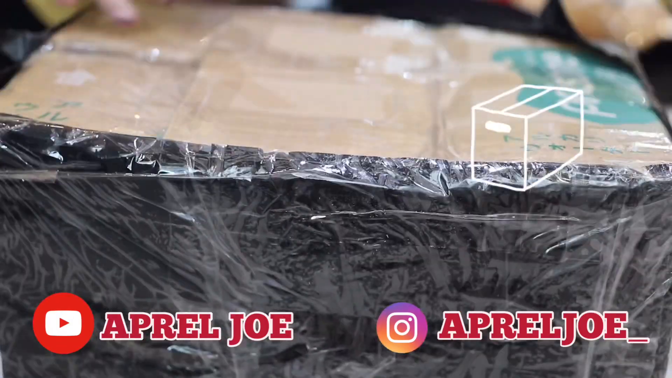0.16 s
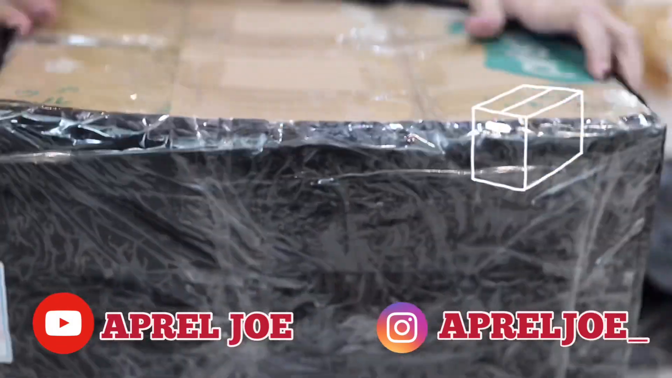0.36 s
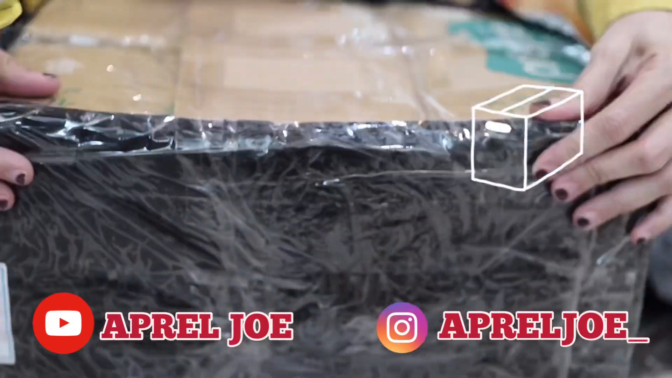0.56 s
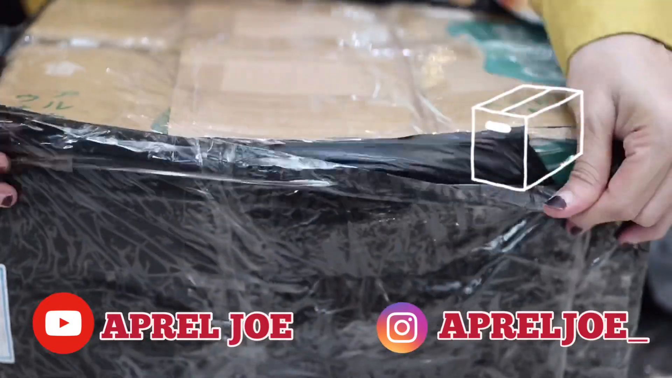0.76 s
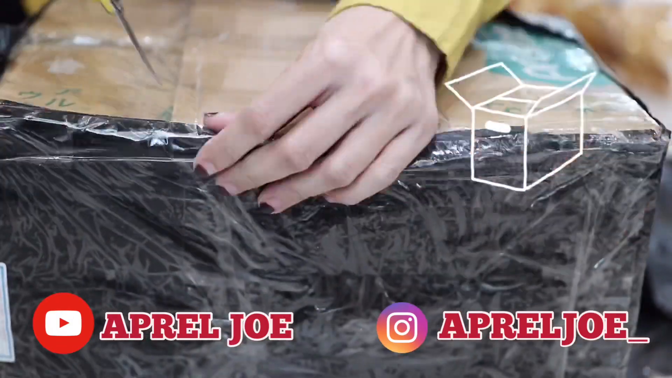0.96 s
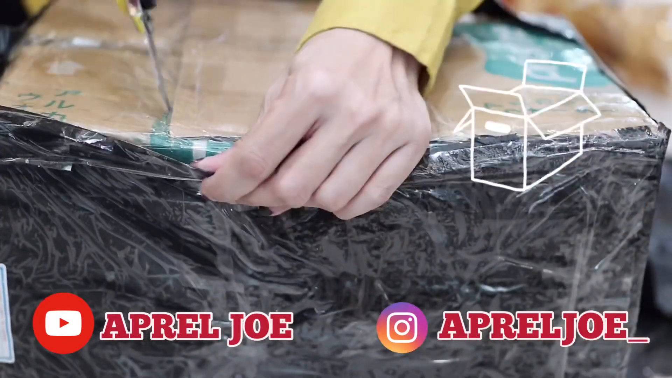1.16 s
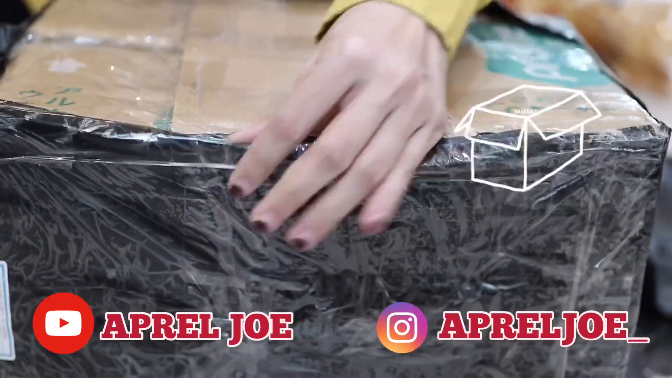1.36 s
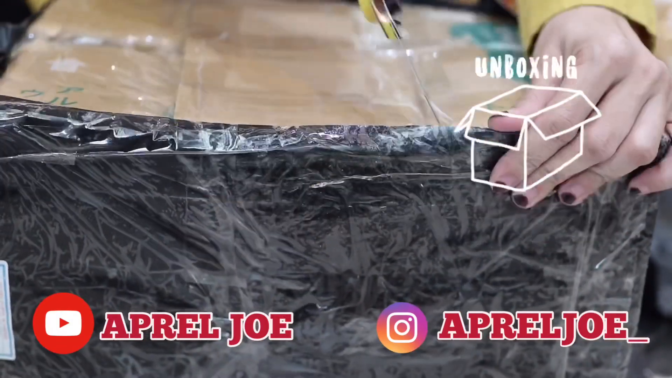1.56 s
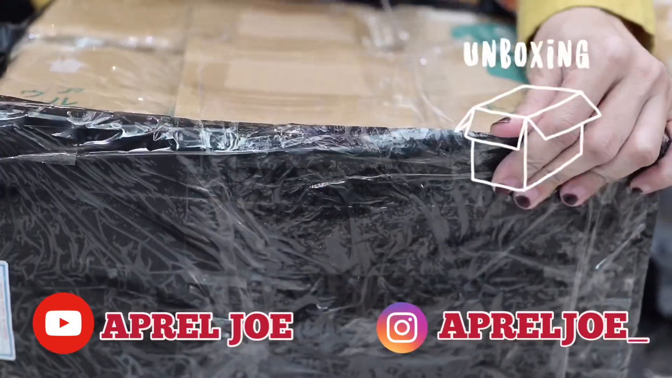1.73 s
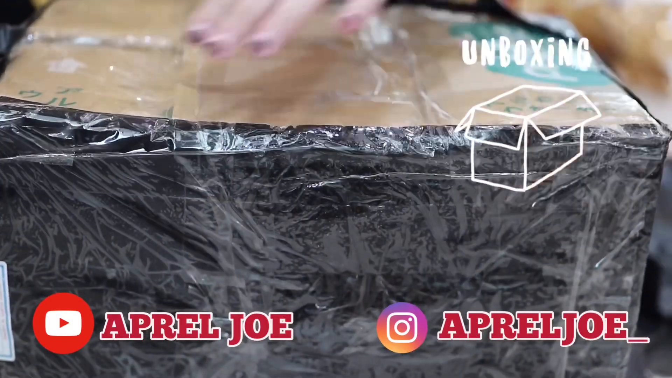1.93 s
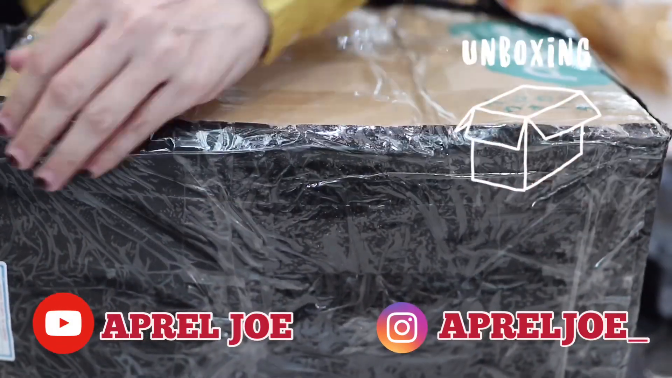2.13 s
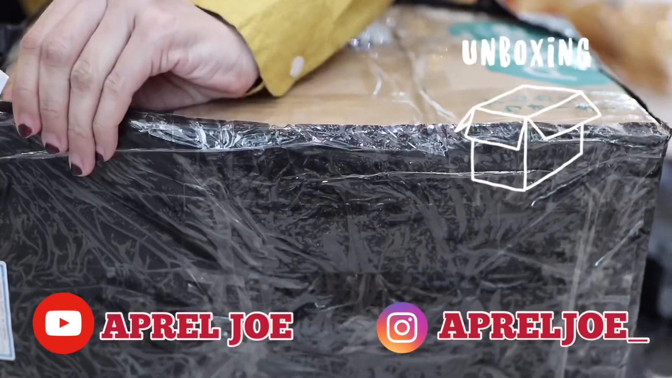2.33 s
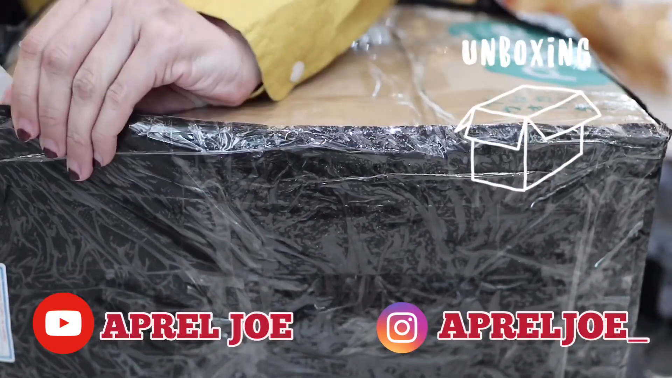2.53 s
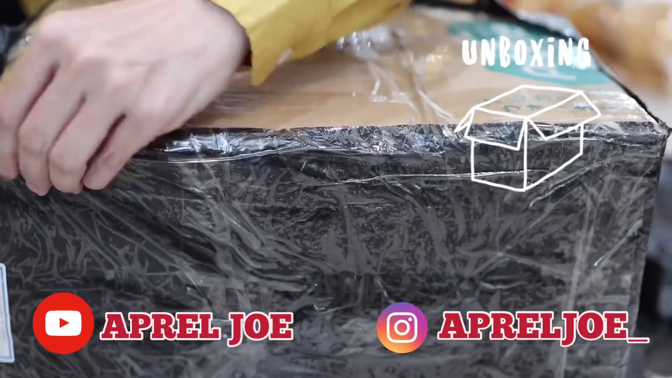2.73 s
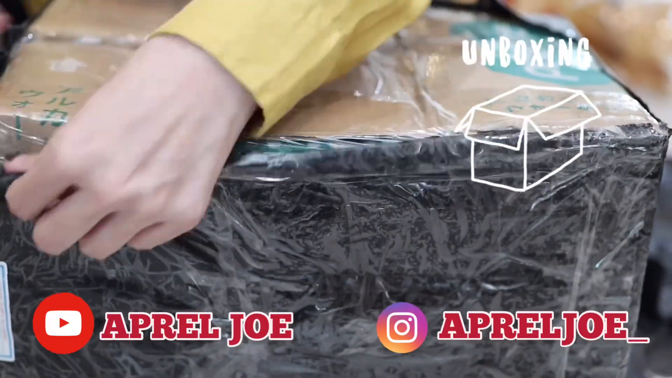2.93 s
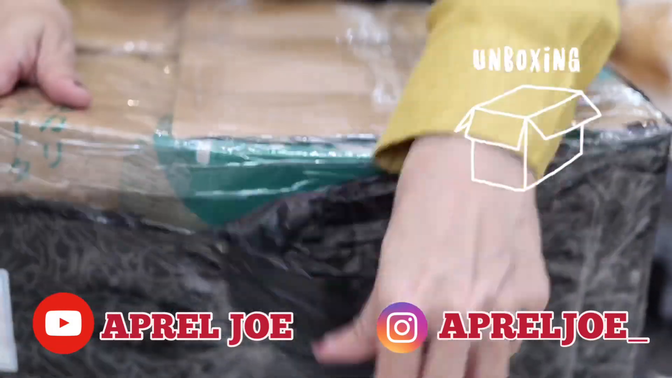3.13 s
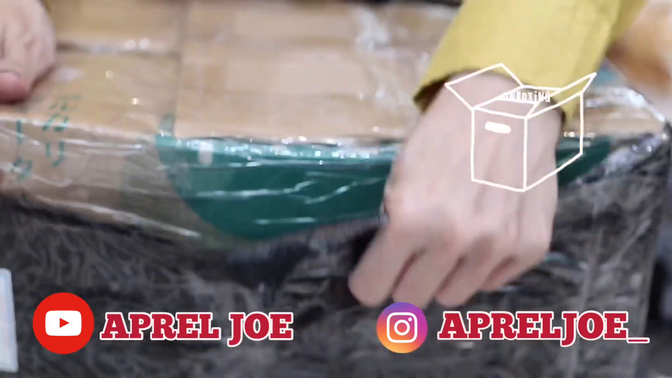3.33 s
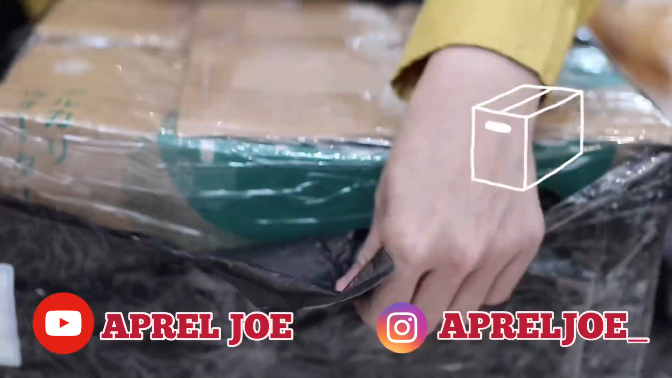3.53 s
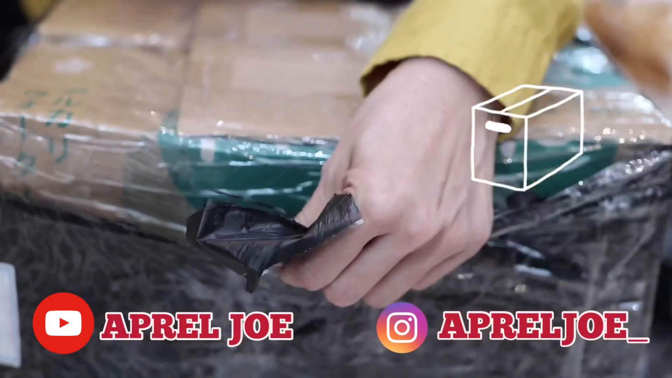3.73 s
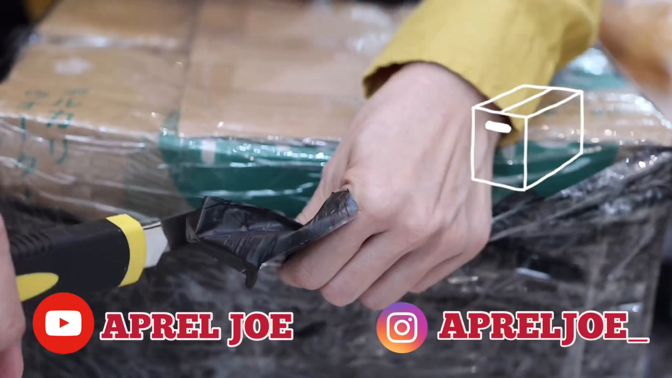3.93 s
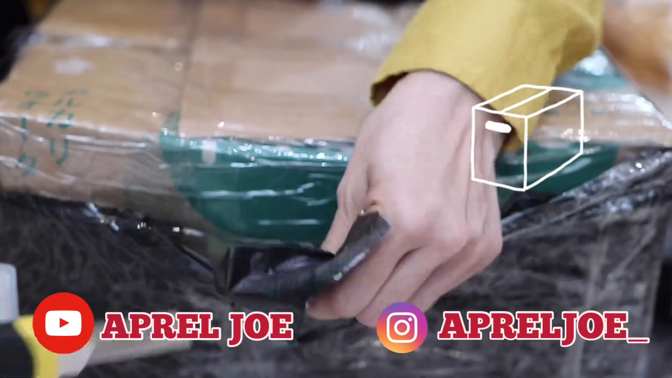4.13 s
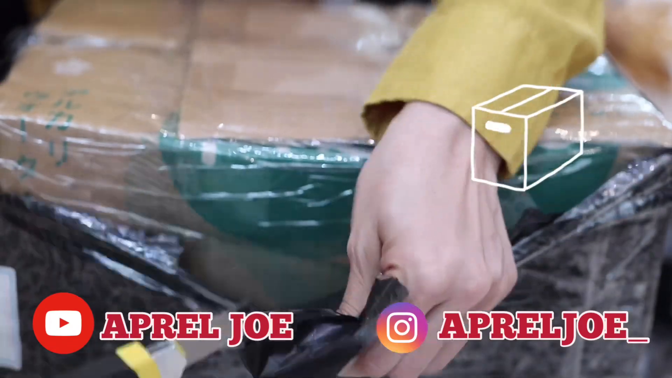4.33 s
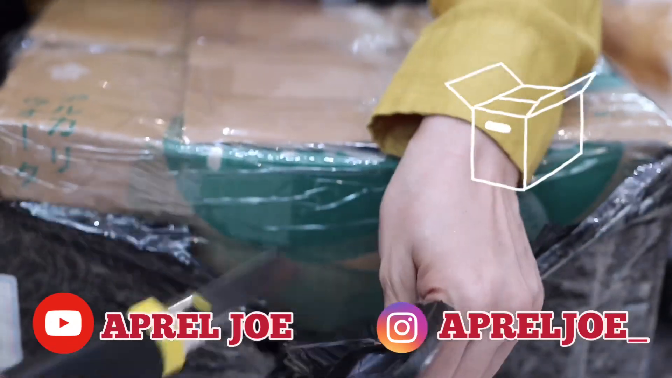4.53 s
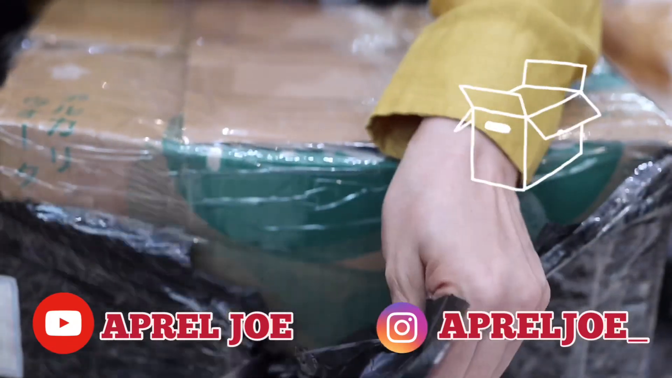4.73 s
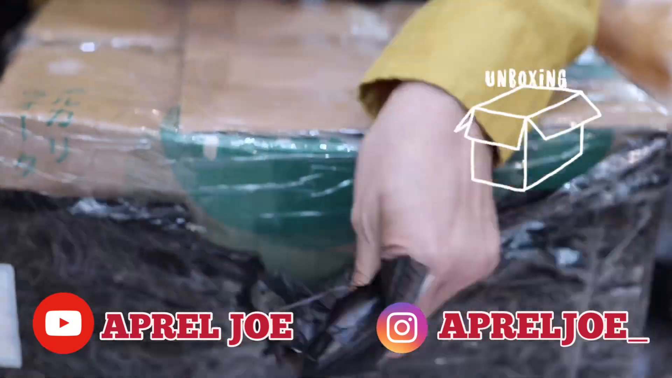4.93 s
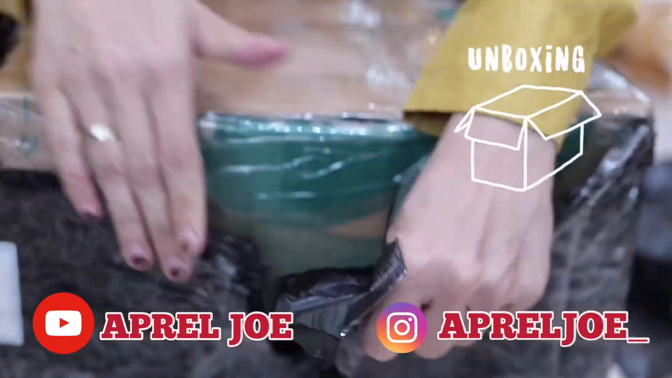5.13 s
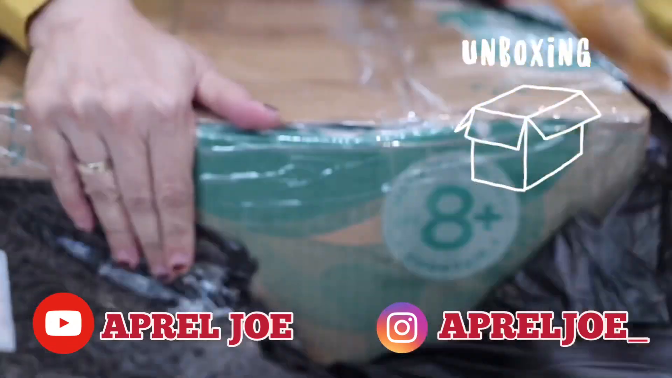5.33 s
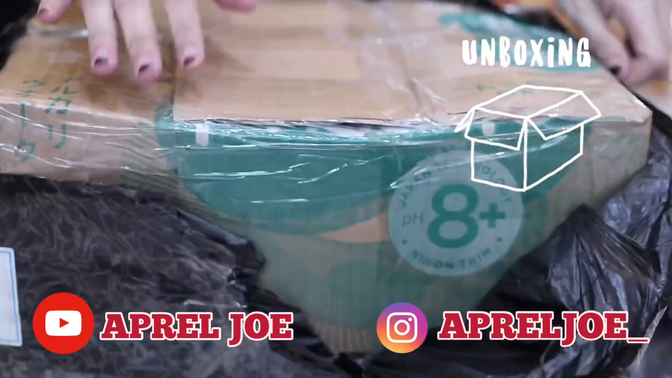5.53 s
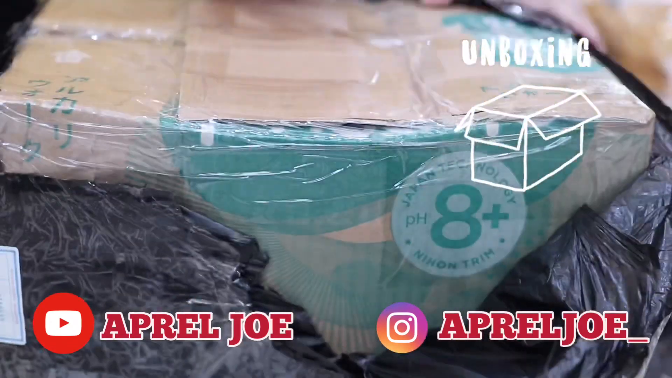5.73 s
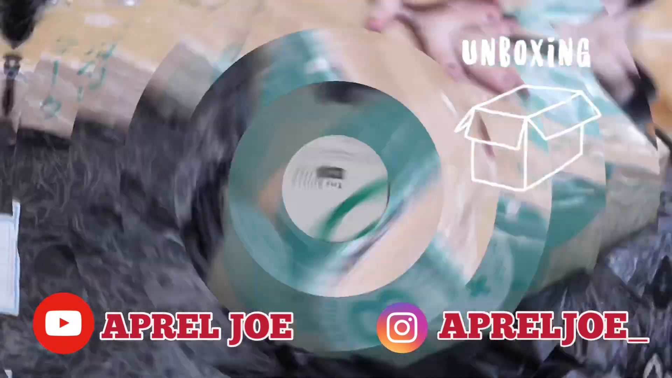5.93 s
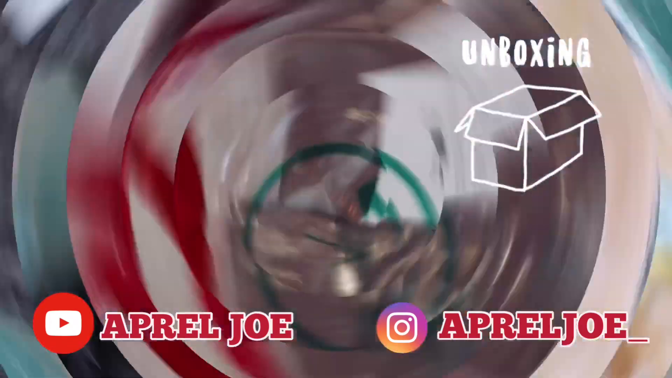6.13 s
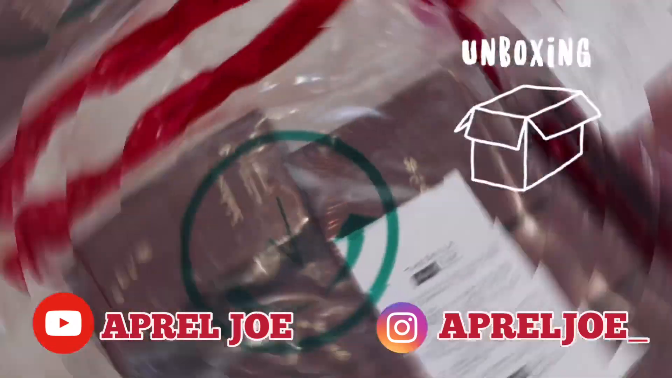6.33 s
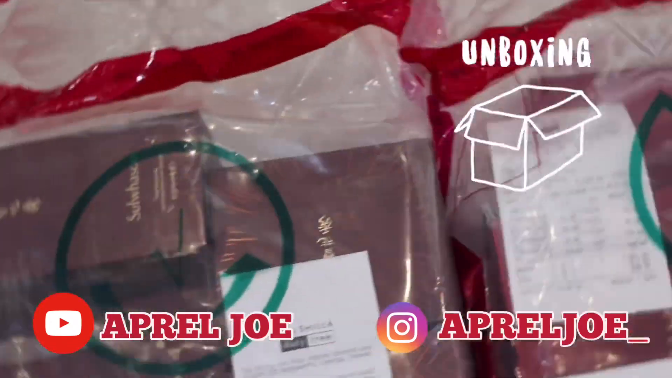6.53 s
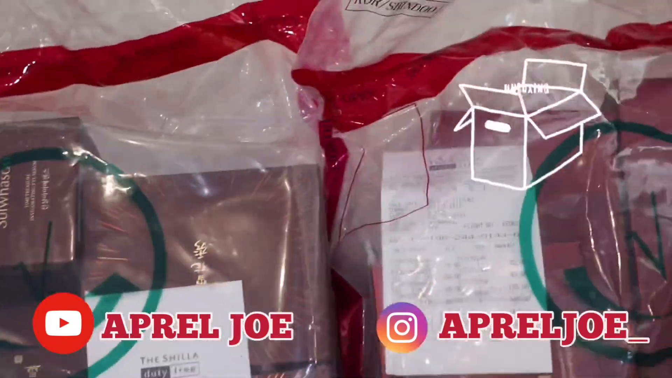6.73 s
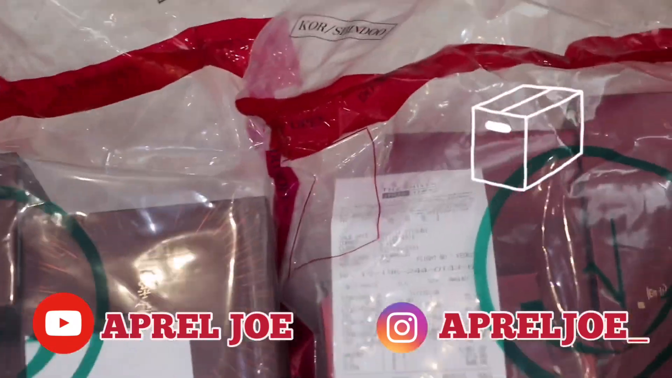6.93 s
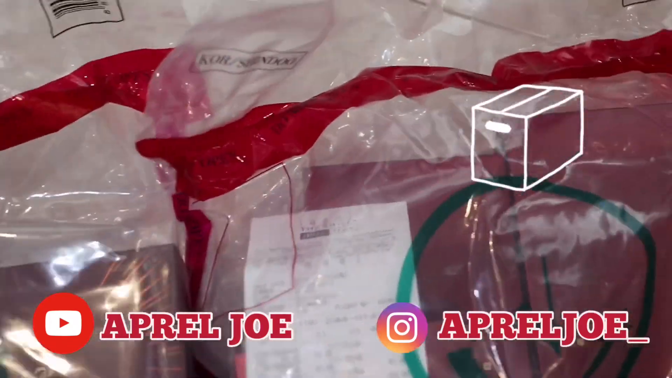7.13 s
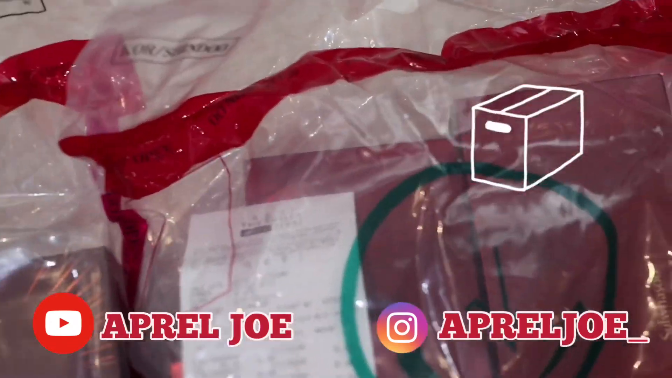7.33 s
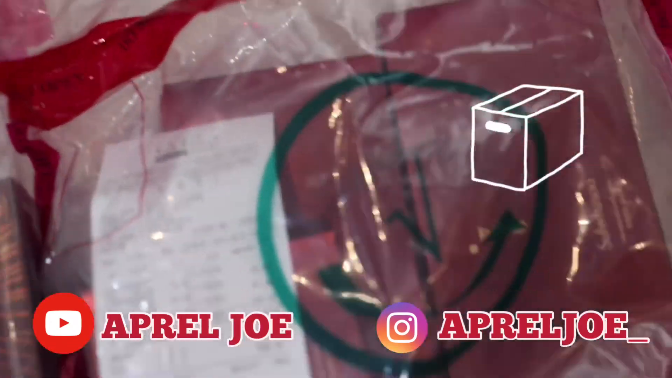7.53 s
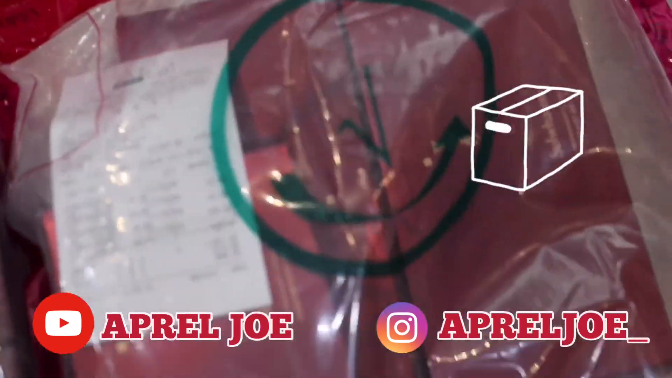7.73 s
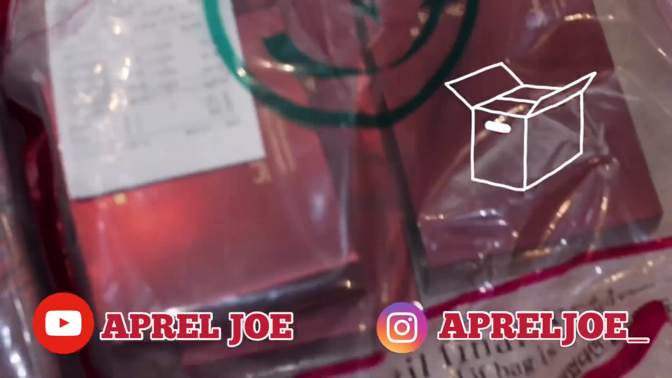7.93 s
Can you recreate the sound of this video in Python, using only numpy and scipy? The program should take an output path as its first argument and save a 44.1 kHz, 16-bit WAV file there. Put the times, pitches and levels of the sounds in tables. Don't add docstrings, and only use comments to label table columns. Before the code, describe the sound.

Close stereo unwrapping indoors: taut film rustles, pops and rips in irregular clusters, the loudest very sharp and dry, while fingers scrape and knock a hollow carton. A soft motor hum lies underneath. After about six seconds everything fades out, and a second, nearly still room rises, narrow and centred, with mains hum, a muffled engine swelling far off and a few dull ticks near the end.

```python
import sys
import numpy as np
from scipy import signal
from scipy.fft import rfft, irfft, next_fast_len
from scipy.io import wavfile
from scipy.ndimage import uniform_filter1d, minimum_filter1d, map_coordinates

SR = 44100
rng = np.random.default_rng(int(sys.argv[2]) if len(sys.argv) > 2 else 0)


def materialize(psi):
    bounded = np.clip(np.atleast_2d(psi).T, -1, 1)
    quanta = np.round(bounded * 32767).astype(np.int16)
    wavfile.write(sys.argv[1], SR, quanta)


def makeup_ratio(level_db):
    decades = np.asarray(level_db, float) / 20
    return 10 ** decades


N = 355446

# (time [s], gain [1])
FADE = [
    (5.9, 0.29),
    (6.238, 0.021),
    (6.246, 0.001),
    (6.5, 0.33),
    (7, 0.73),
]
CUT_S = 6.245

# (frequency [Hz], level [dB per Hz])
FILM_SPECTRUM = [(410, -39), (700, -8.5), (1250, -5.5), (1900, -3.5), (2170, -2.5), (3460, -3), (3920, 0.5),
                 (4390, -0.5), (4860, -2.5), (6750, 0.5), (10500, -12), (13600, -35), (22000, -120)]
# (frequency [Hz], width [Hz], level [dB])
FILM_RESONANCES = [(1130, 260, 2.5), (2200, 160, 1.5), (3000, 240, 5), (4000, 67, 1), (4920, 280, 5.5)]
# (frequency [Hz], level [dB per Hz])
BOARD_SPECTRUM = [(88, -43.5), (150, -10), (241, -1.5), (306, -5.5), (483, -10), (761, -14), (937, -13),
                  (1090, -20), (1600, -17.5), (2080, -44.5), (3520, -120)]

# (time [s], length [s], rustle [dB], scrape [dB], sparkle over rustle [dB])
PULLS = [(0.12, 0.15, -46.5, -49.5, -8.5), (0.75, 0.26, -52, -46.5, 0.5), (1.127, 0.077, -31, -37, -16.5),
         (1.21, 0.098, -34, -33.5, -12), (1.612, 0.11, -33, -29, -20), (1.68, 0.084, -28.5, -25, -15),
         (1.95, 0.11, -51.5, -46.5, -8), (2.78, 0.12, -35.5, -45, -10.5), (3.19, 0.25, -39, -47.5, -12),
         (3.5, 0.18, -40, -61, -11.5), (4.28, 0.15, -43, -56, -8), (4.58, 0.24, -38.5, -48, -10),
         (4.762, 0.027, -31, -31.5, -8), (4.898, 0.081, -33.5, -51.5, -10.5), (5.0, 0.17, -37.5, -53, -14),
         (5.13, 0.17, -30.5, -41, -10), (5.35, 0.19, -42, -39, -10.5), (5.55, 0.14, -45, -45.5, -10),
         (5.72, 0.12, -44.5, -48.5, -15), (6.08, 0.067, -45.5, -64, -6), (0.525, 0.042, -49, -40.5, -7.5)]
# (time [s], rustle [dB], scrape [dB], sparkle over rustle [dB])
SPRINGS = [(0.0, -40, -73, -14), (0.111, -42, -62, -2), (0.345, -44.5, -42, -10), (3.625, -40.5, -50, -6),
           (3.835, -46.5, -61, -7), (2.5, -61, -54, -13), (0.6, -39, -45, -1.5), (0.687, -34.5, -33, -9),
           (2.24, -45, -41, -13.5), (2.39, -58, -56, 10), (2.56, -39, -37.5, -10.5),
           (2.803, -39.5, -50, -3), (2.941, -24, -43, -8.5), (3.0, -34.5, -45.5, -10),
           (3.437, -31, -42, -17), (3.971, -32, -43.5, -0.5), (4.15, -44.5, -49, -1),
           (4.193, -34, -53.5, -6.5), (4.458, -35.5, -37, -8), (5.844, -33, -48, -18),
           (6.019, -33.5, -44, -9)]
GRIP_DB_PER_S, LET_GO_DB_PER_S = 2200, 167
SPRING_DB_PER_S, SETTLE_DB_PER_S, SPRING_S = 1205.5, 161, 0.013
# (rustle [dB], scrape [dB], sparkle [dB])
REST_DB = [-57, -55.5, -61.5]
PRESS_DB = 8

# (frequency [Hz], width [Hz], level [dB])
APPLIANCE_HUM = [(118, 1.6, -40.5), (236.6, 1.6, -43), (369, 12, -55.5), (477, 30, -60)]
# (frequency [Hz], level [dB per Hz])
AIR_SPECTRUM = [(12, -55.5), (20, -18), (38, -19.5), (120, -5), (167, -6), (245, -18.5), (300, -9),
                (555, -27), (754, -15), (1430, -19), (9000, -29), (11700, -72), (19800, -120)]
# (frequency [Hz], level [dB per Hz])
HISS_SPECTRUM = [(59, -79), (100, -53), (163, -52), (266, -9.5), (452, -4), (2630, -10), (4670, -14.5),
                 (6990, -19), (15000, -27.5), (16000, -43)]

# (time [s], peak [dB], ring [Hz], carton knock [dB])
RIPS = [(0.5884, -1, 7250, -12), (0.6718, -1, 4250, -1.5), (1.2322, -6, 2420, -18),
        (1.6161, -15, 2940, -29), (1.7849, -3, 2840, -41.5), (2.5563, -12, 3260, -12),
        (2.7744, -10.5, 3660, -9), (2.8039, -9, 6300, -34), (2.9295, -4.5, 5430, -24),
        (2.9318, -10, 6000, -9), (2.933, 0.5, 6300, -23), (2.9345, -16, 6000, -22), (2.938, -7, 5500, -18),
        (2.9747, -1, 2270, -9), (3.002, -2.5, 1590, -10), (3.3669, -7, 4300, -13), (3.4278, -8, 2340, -26),
        (3.9625, 7.5, 5500, -16), (3.972, -3, 3680, -7.5), (3.9893, -6, 5570, -22), (4.1886, 2.5, 4600, -5),
        (4.1897, 0, 4370, -13), (4.3231, -7.5, 4300, -8), (4.3477, 2.5, 4440, -12.5),
        (4.3488, -6, 4600, -18.5), (4.4704, -5.5, 4820, -6), (4.4717, -18, 4900, -19),
        (4.5718, -9.5, 4270, -7), (4.6373, -8.5, 3520, -11), (4.7352, -5.5, 4650, -28),
        (4.7781, -2, 2390, -19), (4.7828, -4.5, 3000, -15), (4.7855, -5, 2950, -12.5),
        (5.1206, -1, 4560, -39), (5.1283, -5.5, 4330, -11), (5.2256, -6, 5060, -10),
        (5.6327, -9.5, 5150, -18)]
# (time [s], peak [dB], ring [Hz])
POPS = [(0.1233, -19.5, 5300), (0.609, -25, 5760), (0.7166, -18, 2980), (0.961, -19.5, 6350),
        (1.1245, -27, 3160), (1.2945, -29, 5590), (1.556, -22.5, 7380), (2.2243, -18.5, 4200),
        (2.3847, -18, 6800), (2.695, -19.5, 4600), (2.769, -12.5, 4300), (2.868, -14.5, 6000),
        (2.9117, -15.5, 2773), (2.9447, -14, 3840), (3.3121, -18, 3640), (3.3744, -6.5, 4740),
        (3.438, -9.5, 5530), (4.1479, -14.5, 5100), (4.283, -21.5, 3324), (4.313, -5, 4470),
        (4.4007, -10, 3720), (4.5395, -13.5, 5160), (4.6182, -26, 4620), (4.652, -16.5, 4140),
        (5.073, -17, 5840), (5.2068, -12, 6300), (5.2149, -6, 5250), (5.221, -7, 5500), (5.8356, -13, 4440),
        (5.849, -30, 5100),
        (0.1143, -29, 5610), (0.274, -36, 2200), (0.4055, -32.5, 2400), (0.5196, -34.5, 2600),
         (0.574, -35, 5400), (0.8026, -25, 5460), (0.975, -27.5, 6230), (1.2292, -15, 3160),
         (1.3291, -17, 4800), (1.372, -29, 5900), (1.407, -30, 7100), (1.759, -12, 4940),
         (1.788, -5.5, 5200), (2.17, -34, 2660), (2.2647, -26, 4480), (2.5252, -28, 3600),
         (2.5526, -20, 2900), (2.5597, -16, 5140), (2.6497, -26, 4050), (2.7283, -29, 5500),
         (2.801, -11.5, 6400), (2.8468, -15.5, 5600), (2.939, -9, 1570), (3.005, -2, 4580),
         (3.1173, -25, 4700), (3.1733, -30, 6500), (3.267, -28, 5600), (3.356, -23, 4100),
         (3.433, -17, 5300), (3.542, -30, 3900), (3.703, -29, 4700), (3.792, -27.5, 4490),
         (4.1404, -25.5, 5790), (4.1554, -26, 4140), (4.1815, -12.5, 5750), (4.185, -8, 3000),
         (4.2033, -22.5, 5270), (4.3606, -35, 4800), (4.4496, -19.5, 5000), (4.462, -14.5, 4000),
         (4.4647, -10, 2200), (4.4673, -7.5, 3930), (4.537, -20.5, 4700), (4.569, -15.5, 4200),
         (4.5803, -24, 4900), (4.6333, -8, 4240), (4.659, -15, 5100), (4.705, -7.5, 4450),
         (4.7396, -16, 5400), (4.7807, 0, 3480), (4.994, -35, 2300), (5.0776, -28, 4000), (5.44, -25, 1997),
         (5.636, -14, 3900), (5.6506, -21, 5400), (5.791, -26, 4960), (5.8398, -14, 5450),
         (5.972, -20, 5060)]
# (time [s], peak [dB], carton knock [dB])
SLAPS = [(0.2269, -20, 9), (0.2354, -32.5, 7), (0.349, -27.5, 7), (1.7772, -10, -4), (2.043, -14.5, 0),
         (2.2279, -28, -3), (2.8841, -27.5, 8), (2.9367, -14, -11), (3.2203, -29.5, 6.5), (3.282, -28, 2),
         (3.4562, -23.5, 3.5), (3.5395, -24, 2), (3.56, -22, -2), (3.581, -26.5, -13), (3.9059, -15, 4.5),
         (3.914, -48.5, 2), (4.456, -23, 3.5), (4.5782, -29, 2), (4.695, -23.5, -1), (4.7089, -16.5, -2),
         (4.7747, -7.5, -12), (5.133, -11, -11), (5.28, -21.5, -2), (5.2865, -18, -4), (5.425, -34.5, 11),
         (5.4488, -26.5, 5.5), (5.749, -34, 6), (5.9067, -23.5, -2.5), (5.992, -16.5, -7.5),
         (6.0161, -10, -4.5), (6.025, -29, 8), (6.037, -22, 1), (6.048, -28, 5), (6.057, -36, 0),
         (6.09, -46, 9), (6.131, -34.5, 7.5), (6.139, -38, -1)]
# (time [s], peak [dB])
TICKS = [(0.1778, -26), (0.8333, -29), (1.0055, -29.5), (1.3315, -26), (1.3492, -25.5), (1.4173, -24.5),
         (2.26, -18.5), (2.2819, -34), (2.3799, -17.5), (2.5055, -32), (2.534, -24), (2.635, -25.5),
         (2.5, -37), (2.8494, -28), (3.1045, -30), (3.629, -25), (3.6728, -21), (3.7259, -25),
         (3.8379, -22.5), (4.2742, -20.5), (4.2928, -26.5), (4.4347, -19), (4.7645, -9.5), (5.0603, -17),
         (5.5548, -30), (5.5825, -25), (5.7695, -20.5)]
# (time [s], peak [dB], ring [Hz])
MORE_POPS = [(0.474, -34, 6500), (0.544, -34.5, 3000), (1.135, -24, 3170), (1.222, -21, 4500),
             (1.6367, -17, 3900), (1.7074, -19, 4680), (2.752, -19, 4500), (2.807, -14, 5500),
             (2.828, -16, 5000), (2.9235, -26, 5000), (2.9253, -24, 3500), (2.9705, -10.5, 2010),
             (4.1762, -27.5, 6000), (4.3462, -17.5, 4450), (4.9932, -17.5, 6500), (5.002, -30, 5000)]
POP_KNOCK_DB, SLAP_HZ, TICK_HZ, TICK_KNOCK_DB = -16.5, 3000, 4600, -13.5
CHAIN_DB, CHAIN_S, CLEAN_DB = -9, 0.006, -11
BOUNCE_S, BOUNCE_DB = 0.0012, -3.5
SPIKE_DB, SHIVER_DB = 4, -24.5
# (frequency [Hz], gain [dB])
GRILLE_DIP = [(6500, 0), (10000, -6), (14500, 1)]

# (frequency [Hz], T60 [s])
ROOM_T60 = [(200, 0.12), (1000, 0.1), (4000, 0.1), (12000, 0.14)]
# (frequency [Hz], gain [dB])
TAIL_COLOUR = [(1500, -4), (4500, 0)]
BUILD_S = 0.0076

# (time [s], peak [dB], frequency [Hz])
THUMPS = [(1.231, -15.5, 462), (1.995, -25.5, 358.6), (2.227, -21.5, 650), (3.169, -30.5, 312),
          (3.184, -33, 330), (3.198, -25.5, 306), (3.215, -34, 302), (3.233, -27.5, 293), (4.778, -16, 300),
          (5.134, -23.5, 265), (5.282, -25, 334.7), (2.867, -31, 900), (5.4245, -24, 620),
          (5.46, -25.5, 900), (3.905, -25, 340), (0.2262, -21, 810), (5.703, -26.5, 258), (6.02, -40, 740)]
# (time [s], level [dB])
LOW_PULSES = [
    (4.1878, -6.5),
    (4.3507, -23),
]
# (frequency [Hz], level [dB per Hz])
FLAP_SPECTRUM = [(350, -41.5), (650, -1), (1200, -3), (2200, -8), (4000, -51.5)]
RATTLE_DB, RATTLE_S, RATTLE_DB_PER_S = -25.5, 0.0037, 266.5

# (time [s], pitch [Hz], level [dB], third multiple [dB])
SQUEAK = [
    (4.898, 1350, -51, 14),
    (4.922, 1450, -42.5, 18),
    (4.942, 1557, -42, 17),
    (4.962, 1395, -46, 16),
    (4.98, 1526, -41, 0),
    (5.012, 1710, -41, 9),
    (5.04, 1540, -43, -4),
]
# (frequency [Hz], side over mid [dB])
SIDE_WIDTH = [(100, -43), (300, -35.5), (1000, -27), (3000, -14), (5500, -9.5), (8000, -1), (15000, 2)]

# (frequency [Hz], width [Hz], level [dB])
MAINS_HUM = [(98.7, 1.7, -49), (210, 2.1, -67)]
# (frequency [Hz], level [dB per Hz])
STREET_SPECTRUM = [(12, -75.5), (20, -37), (43, -25), (92, -15.5), (111, -17), (127, -21), (157, -12),
                   (222, -5.5), (291, -11.5), (615, -18), (919, -21.5), (5380, -41.5), (12000, -51),
                   (15600, -99), (22000, -120)]
# (frequency [Hz], level [dB per Hz])
BOOM_SPECTRUM = [(71, -42), (120, -14), (129, -20.5), (221, 6), (292, -5.5), (416, -41.5), (454, -4.5),
                 (500, -35), (650, -64), (1100, -120)]
# (time [s], boom [dB], drone [dB])
ENGINE = [
    (6.25, -58, -51.5),
    (6.7, -41.5, -49.5),
    (6.95, -48.5, -51),
    (7.2, -41.5, -52),
    (7.45, -36, -52),
    (7.7, -36.5, -52.5),
    (7.85, -44.5, -52.5),
    (8.06, -46, -51),
]
# (time [s], peak [dB])
FAR_CRACKLE = [
    (7.8924, -30),
    (7.895, -36),
    (7.902, -41),
    (7.913, -38),
    (7.93, -41),
    (7.943, -41),
    (7.96, -45),
    (7.975, -43),
    (8.015, -43),
]

# (frequency [Hz], gain [dB])
MIC_BAND = [(20, -12.5), (80, 5.5), (15750, -0.5), (15950, -43.5), (17200, -46.5), (17600, -100)]
# (frequency [Hz], level under the other [dB])
MASKED = [(300, -29), (1000, -16), (5000, -9), (8000, -20.5), (10000, -0.5), (15000, -6.5)]
# (frequency [Hz], level [dB])
AUDIBLE = [(7000, -84), (8500, -78), (10000, -72.5), (12000, -71.5), (14000, -72), (15700, -73)]
BUSY_DB, BUSY_SHARE, RAGGED_DB = -54.5, 0.6, 3.5


def unit(x):
    return x / np.sqrt(np.mean(x ** 2) + 1e-20)


def along(points, hz):
    f, v = np.transpose(points)
    return np.interp(np.log(hz + 1), np.log(f + 1), v)


def curves(rows):
    s, *cols = np.transpose(rows)
    return [np.interp(np.arange(N) / SR, s, c) for c in cols]


def wobble(rate_hz):
    knots = rng.standard_normal(int(N * rate_hz / SR) + 4)
    return map_coordinates(knots, [np.arange(N) * rate_hz / SR])


def coloured(x, spectrum):
    m = next_fast_len(N + 8192)
    gain = makeup_ratio(along(spectrum, np.fft.rfftfreq(m, 1 / SR)))
    return irfft(rfft(x, m) * gain, m)[..., :N]


def patchy(x, patchy_db):
    z = signal.stft(x, nperseg=512)[2]
    field = uniform_filter1d(rng.standard_normal(z.shape[-2:]), 3, 0)
    field = uniform_filter1d(field, 6, 1)
    return signal.istft(z * makeup_ratio(patchy_db * unit(field)), nperseg=512)[1][..., :N]


def noise(spectrum, patchy_db):
    return unit(coloured(patchy(rng.standard_normal(N), patchy_db), spectrum))


def crackle(rate_hz, spread_db):
    density = rate_hz / SR * makeup_ratio(2.6 * wobble(60))
    struck = rng.random(N) < density
    size = struck * makeup_ratio(spread_db * np.minimum(rng.exponential(size=N), 3))
    burst = np.convolve(size, makeup_ratio(-60 * np.arange(128) / SR / 0.0037))[:N]
    burst = burst / np.sqrt(np.abs(uniform_filter1d(burst ** 2, size=2600)) + 1e-3)
    return burst * rng.standard_normal((2, N))


def film(x):
    rung = sum(makeup_ratio(db) * signal.lfilter(*signal.iirpeak(hz, hz / width_hz, SR), x)
               for hz, width_hz, db in FILM_RESONANCES)
    return coloured(x + 0.41 * rung, FILM_SPECTRUM)


def effort(moves, rise_db_per_s, fall_db_per_s, press_db):
    t, power = np.arange(0, N / SR, .001), 0
    for s, length_s, rustle_db, scrape_db, sparkle_db in moves:
        rise_db = -rise_db_per_s * np.maximum(s - t, 0)
        fall_db = -fall_db_per_s * np.maximum(t - s - length_s, 0)
        eased_db = press_db * np.minimum((2 * (t - s) / length_s - 1) ** 2, 1)
        flat = 0 * t
        levels_db = np.array([rustle_db + flat, scrape_db - eased_db, rustle_db + sparkle_db + flat])
        power = power + makeup_ratio(2 * (rise_db + fall_db + levels_db))
    return np.array([np.interp(np.arange(N) / SR, t, p) for p in power])


def hands():
    spring_moves = [(s, SPRING_S, *levels) for s, *levels in SPRINGS]
    springs = effort(spring_moves, SPRING_DB_PER_S, SETTLE_DB_PER_S, press_db=4)
    pulls = effort(PULLS, GRIP_DB_PER_S, LET_GO_DB_PER_S, PRESS_DB)
    rest = makeup_ratio(1.967 * (np.array(REST_DB)[:, None] + 4.7 * wobble(12)))
    rustling, scraping, sparkling = np.sqrt(pulls + springs + rest)
    folds = crackle(1500, spread_db=3) * .3 + crackle(9000, spread_db=2) * .75
    folds = patchy(folds, patchy_db=2.5)
    rustle = rustling * makeup_ratio(0.5) * unit(film(folds))
    sparkle = sparkling * unit(coloured(folds, [(8000, -63.0), (10000, -8.5)]))
    rubbing = patchy(crackle(5000, spread_db=0.5), patchy_db=1.8)
    scrape = scraping * makeup_ratio(-1.0) * unit(coloured(rubbing, BOARD_SPECTRUM))
    return rustle + sparkle + scrape


def drone(lines):
    t, out = np.arange(N) / SR, 0
    for hz, width_hz, db in lines:
        level = np.sqrt(2) * makeup_ratio(db + wobble(width_hz))
        wander = np.cumsum(width_hz * wobble(4 * width_hz)) / SR
        out = out + level * np.sin(2 * np.pi * (hz * t + wander))
    return out


def appliance():
    return drone(APPLIANCE_HUM) + makeup_ratio(-40.5) * noise(AIR_SPECTRUM, patchy_db=2.0)


def room(x):
    out, step = np.zeros((2, N + SR)), SR // 4
    for i in range(0, N, step):
        if np.abs(x[i:i + step]).max() <= 1e-4:
            continue
        hz, t, z = signal.stft(rng.standard_normal((2, SR // 3)), SR, nperseg=256)
        decay = makeup_ratio(-60 * t / along(ROOM_T60, hz)[:, None])
        tail = signal.istft(z * decay, SR, nperseg=256)[1]
        tail = tail * (1 - np.exp(-np.arange(tail.shape[1]) / SR / BUILD_S))
        wet = signal.fftconvolve(x[None, i:i + step], tail / np.linalg.norm(tail[0]), axes=1)
        out[:, i + 60:][:, :wet.shape[1]] += wet[:, :N + SR - i - 60]
    return out[:, :N]


def snaps(rows):
    out, blows, t = np.zeros((2, N + SR)), np.zeros((2, N)), np.arange(700) / SR
    carton = signal.butter(2, (640, 1700), "band", fs=SR)
    whole_carton = signal.butter(2, (620, 1250), "band", fs=SR)
    for s, db, hz, knock_db in rows:
        softness_db = min(db + 8.0, 0)
        life_s = 0.00067 * makeup_ratio(-.3 * softness_db)
        later = t - CHAIN_S * rng.random((3, 1))
        chain = (np.exp(-(later / life_s) ** 2) * (later > 0)).max(axis=0)
        chain = makeup_ratio(CHAIN_DB - max(db - CLEAN_DB, 0)) * chain
        envelope = np.exp(-(t / life_s) ** 2) + chain + makeup_ratio(SHIVER_DB - 60 * t / 0.016)
        jolt = rng.standard_normal((3, len(t))) * envelope
        spikes = makeup_ratio(SPIKE_DB + 0.35 * softness_db + np.array([2.5, BOUNCE_DB]))
        jolt[::2, [4, 4 + round(BOUNCE_S * SR)]] += spikes
        ring = signal.lfilter(*signal.iirpeak(min(hz, 9000), 1.5, SR), jolt[:2])
        knock = signal.lfilter(*(whole_carton if knock_db > 3 else carton), jolt[2])
        crack = ring / np.abs(ring[0]).max() + 0.1 * np.diff(jolt[:2], prepend=0)
        thud = makeup_ratio(knock_db - 4.5) * knock / np.abs(knock).max()
        out[:, round(s * SR):][:, :len(t)] += makeup_ratio(db) * (crack + thud)
        blows[:, round(s * SR)] = makeup_ratio([db, db + knock_db])
    direct = np.array([coloured(out[0, :N], GRILLE_DIP), out[1, :N]])
    bright = makeup_ratio(5.5) * coloured(film(blows[0]), TAIL_COLOUR)
    return direct + room(bright + makeup_ratio(6.5) * signal.lfilter(*carton, blows[1]))


def folds_snapping():
    pops = [(s, db, hz, POP_KNOCK_DB) for s, db, hz in POPS]
    slaps = [(s, db, SLAP_HZ, knock_db) for s, db, knock_db in SLAPS]
    ticks = [(s, db, TICK_HZ * makeup_ratio(2 * rng.standard_normal()), TICK_KNOCK_DB) for s, db in TICKS]
    creases = [(s, db, hz, POP_KNOCK_DB) for s, db, hz in MORE_POPS]
    return RIPS + pops + slaps + ticks + creases


def thumps():
    out, t = np.zeros(N + SR), np.arange(1500) / SR
    for s, db, hz in THUMPS:
        ring = np.sin(2 * np.pi * hz * t) + 0.35 * np.sin(2 * np.pi * 1.4 * hz * t)
        envelope = makeup_ratio(db - 0.5 - 60 * t * hz / 14) * (1 - np.exp(-t / 0.00041))
        out[round(s * SR):][:len(t)] += envelope * ring
    for s, db in LOW_PULSES:
        out[round(s * SR):][:len(t)] -= makeup_ratio(db) * np.exp(-t / 0.00031)
    return out[:N]


def rattle():
    t, level = np.arange(SR // 4) / SR, np.zeros(N + SR)
    for s, db, knock_db in SLAPS:
        fall_db = RATTLE_DB_PER_S * np.maximum(t - RATTLE_S, 0)
        level[round(s * SR):][:len(t)] += makeup_ratio(db + knock_db + RATTLE_DB - fall_db)
    return level[:N] * unit(coloured(crackle(1500, spread_db=2.5), FLAP_SPECTRUM))


def squeak():
    hz, db, third_db = curves(SQUEAK)
    turn = 2 * np.pi * np.cumsum(hz * (1 + .03 * wobble(700))) / SR
    smeared = wobble(800) * np.sin(3 * turn) + wobble(800) * np.cos(3 * turn)
    pulses = makeup_ratio(4.5 * wobble(120)) * (np.sin(turn) + 0.33 * np.sin(2 * turn))
    tone = pulses + makeup_ratio(third_db - 2.5 + 1.2 * wobble(210)) * smeared
    t = np.arange(N) / SR
    return makeup_ratio(db) * tone * ((t > SQUEAK[0][0]) & (t < SQUEAK[-1][0]))


def first_room(fade):
    near = hands() + snaps(folds_snapping()) + rattle() + squeak()
    near = near * np.minimum(5 * fade, 1)
    mid = near[0] + thumps() + fade * appliance()
    return np.array([mid, coloured(near[1], SIDE_WIDTH)])


def engine():
    boom_db, drone_db = curves(ENGINE)
    boom = makeup_ratio(boom_db) * noise(BOOM_SPECTRUM, patchy_db=-1.0)
    return boom + makeup_ratio(drone_db + 10.5) * noise(STREET_SPECTRUM, patchy_db=0.0)


def far_crackle():
    ticks = snaps([(s, db, 4000, -8) for s, db in FAR_CRACKLE])[0]
    return coloured(ticks, [(1800, -0.5), (5500, -6.0), (7000, -17.5)])


def second_room(fade):
    return np.array([far_crackle() + fade * (engine() + drone(MAINS_HUM)), np.zeros(N)])


def scene():
    fade, = curves(FADE)
    first = np.arange(N) < CUT_S * SR
    mid, side = np.where(first, first_room(fade), second_room(fade))
    side = side + fade * makeup_ratio(-51.5) * noise(HISS_SPECTRUM, patchy_db=-2.5)
    return np.array([makeup_ratio(-2.5) * (mid + side), makeup_ratio(-2.5) * (mid - side)])


def joint_stereo(x, loud_db):
    hz, _, z = signal.stft([x[0] + x[1], x[0] - x[1]], SR, nperseg=1536)
    bands = np.add.reduceat(np.abs(z) ** 2, np.arange(0, len(hz), 16), axis=1)
    smooth = np.abs(uniform_filter1d(bands, size=3, axis=2))
    power = np.repeat(smooth, 16, axis=1)[:, :len(hz)]
    kept = power > power[::-1] * makeup_ratio(2 * along(MASKED, hz))[:, None]
    kept[0] |= power[0] > makeup_ratio(2 * loud_db)
    crackle_power = power[0, (hz > 3000) & (hz < 8000)].mean(axis=0)
    busy = -minimum_filter1d(-crackle_power, size=5) / makeup_ratio(2 * BUSY_DB)
    chance = unit(uniform_filter1d(rng.standard_normal(bands.shape[1:]), size=3, axis=1))
    chance = np.repeat(chance, 16, axis=0)[:len(hz)]
    threshold = makeup_ratio(2 * (along(AUDIBLE, hz)[:, None] + RAGGED_DB * chance)) * busy ** BUSY_SHARE
    kept[0] &= power[0] > threshold * (hz > 7000)[:, None]
    kept[1, hz > 7000] = True
    mid, side = signal.istft(z * kept, SR, nperseg=1536)[1][:, :N] / 2
    return np.array([mid + side, mid - side])


def top_cut(x):
    return signal.sosfilt(signal.butter(12, 16730, fs=SR, output="sos"), x)


def record(dry):
    clipped = dry / (1 + np.abs(dry) ** 8) ** (1 / 8)
    mix = joint_stereo(coloured(clipped, MIC_BAND), loud_db=-54.0)
    return top_cut(mix)


dry = scene()
out = record(dry)
materialize(out)
```